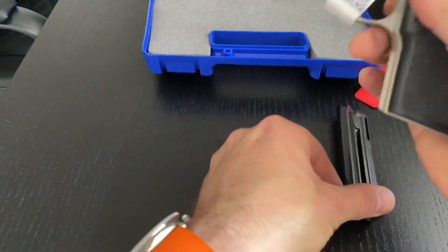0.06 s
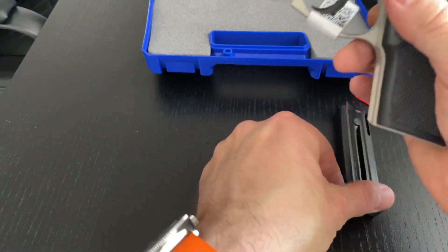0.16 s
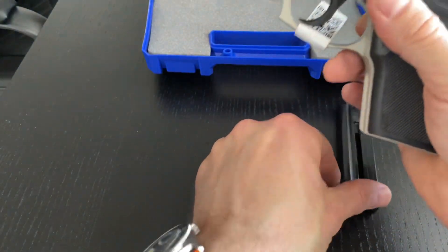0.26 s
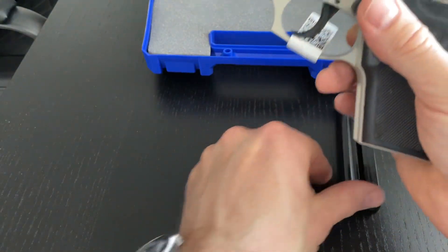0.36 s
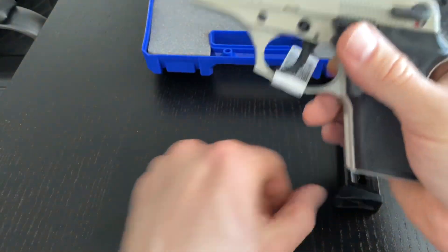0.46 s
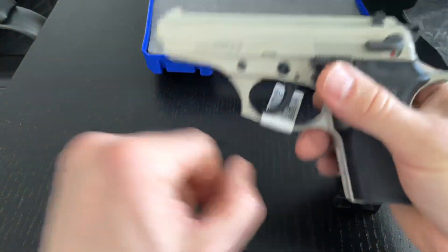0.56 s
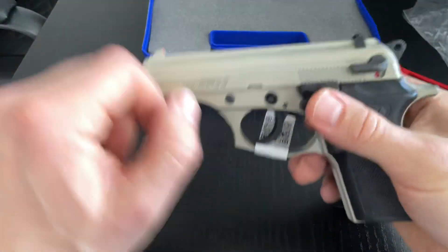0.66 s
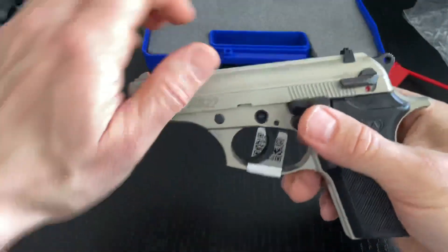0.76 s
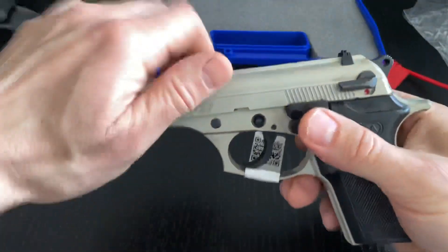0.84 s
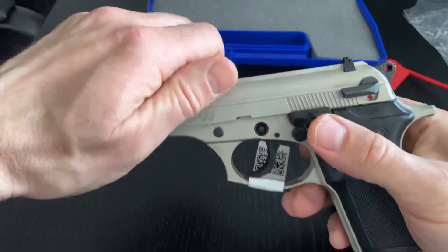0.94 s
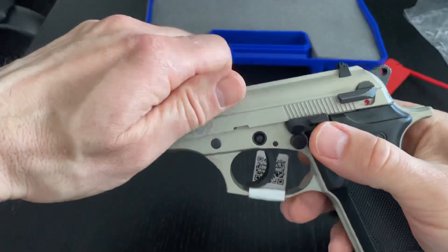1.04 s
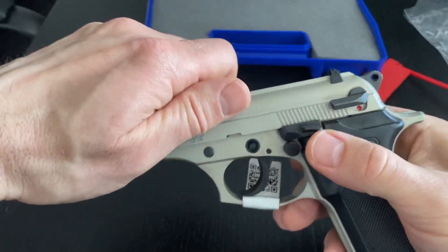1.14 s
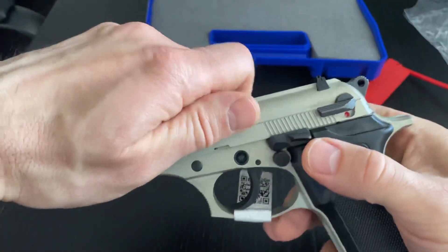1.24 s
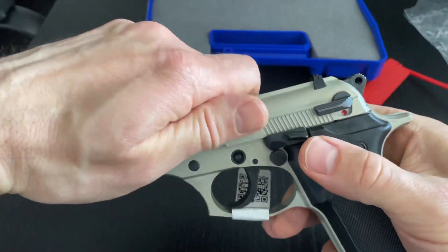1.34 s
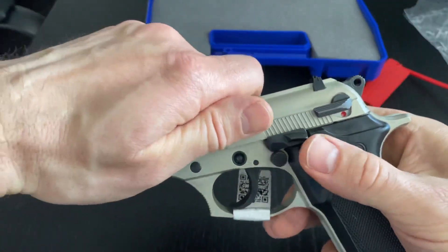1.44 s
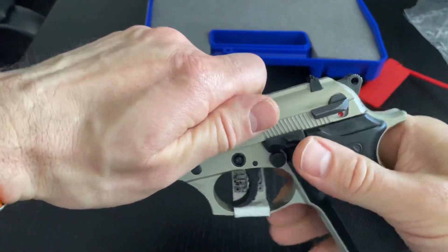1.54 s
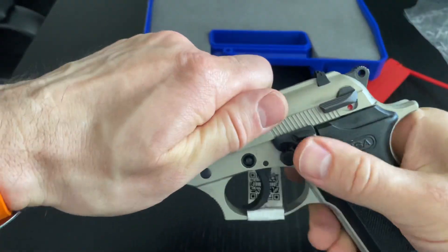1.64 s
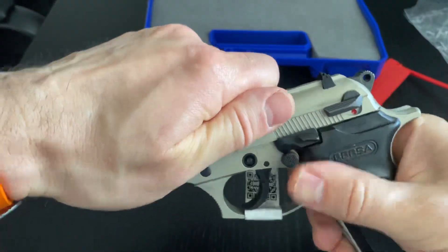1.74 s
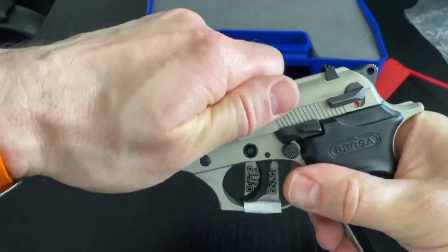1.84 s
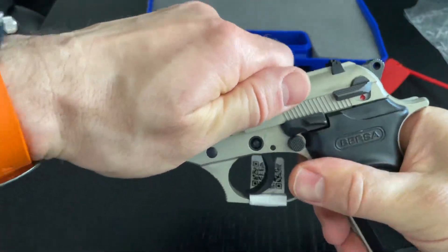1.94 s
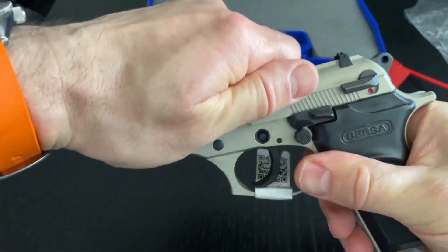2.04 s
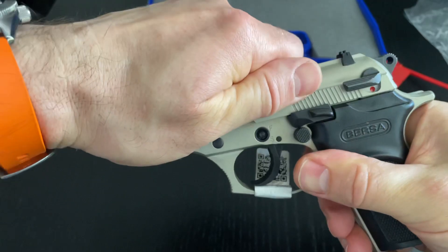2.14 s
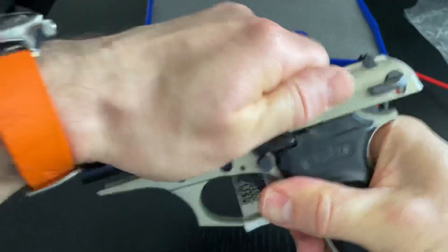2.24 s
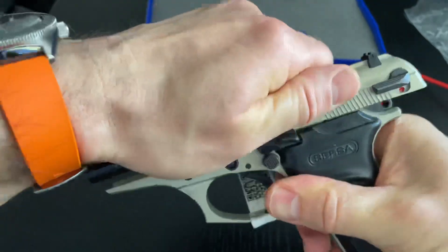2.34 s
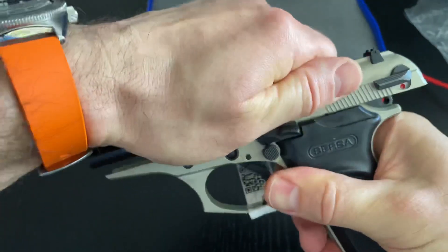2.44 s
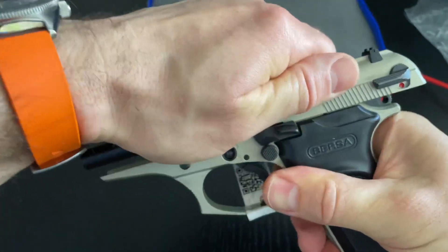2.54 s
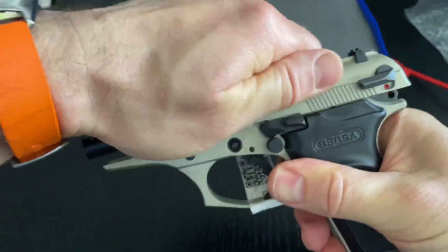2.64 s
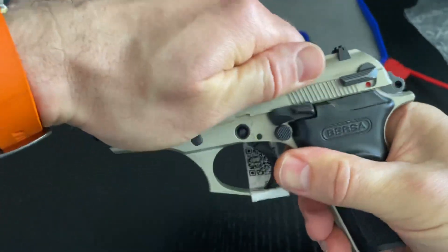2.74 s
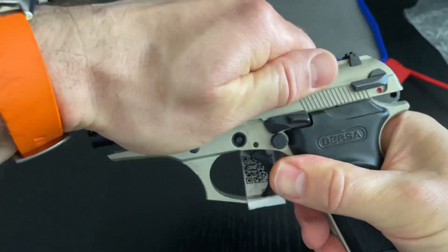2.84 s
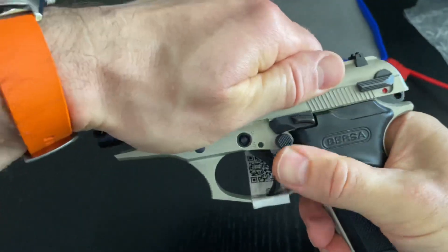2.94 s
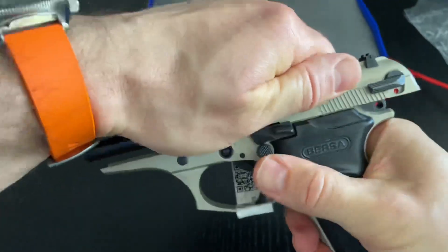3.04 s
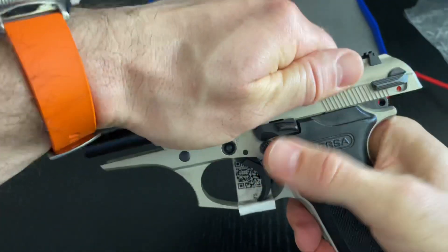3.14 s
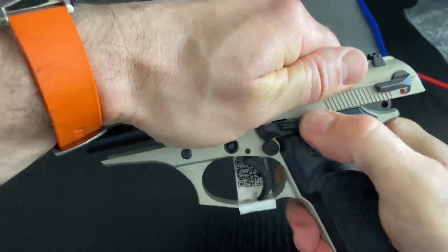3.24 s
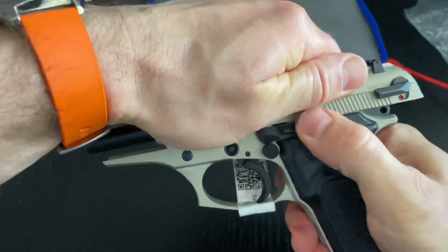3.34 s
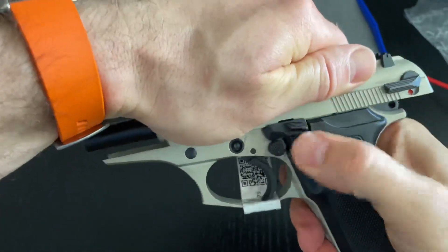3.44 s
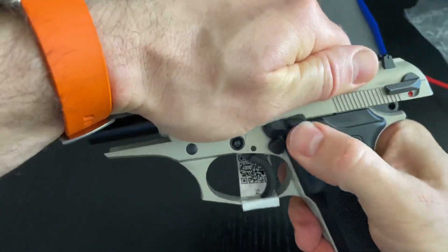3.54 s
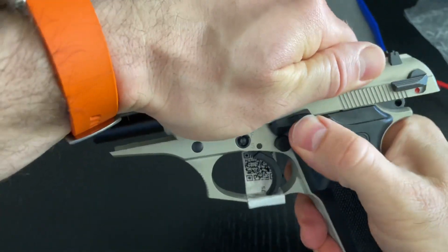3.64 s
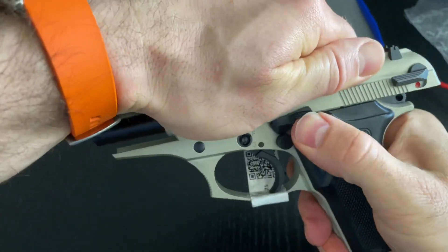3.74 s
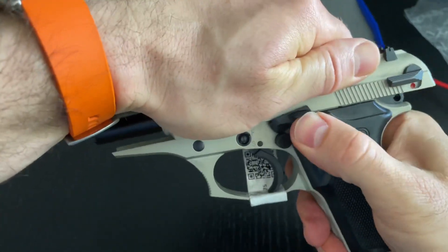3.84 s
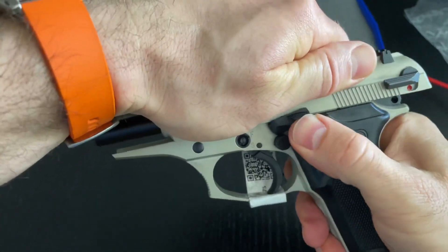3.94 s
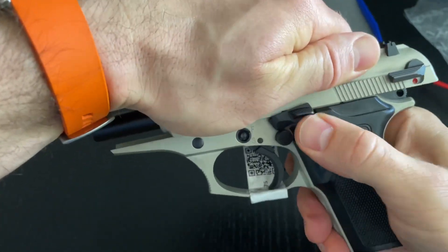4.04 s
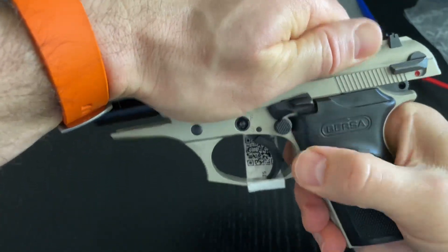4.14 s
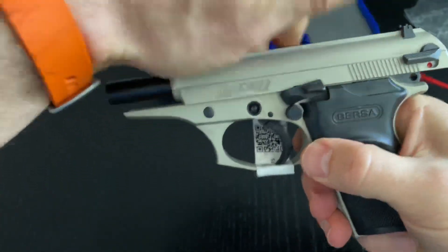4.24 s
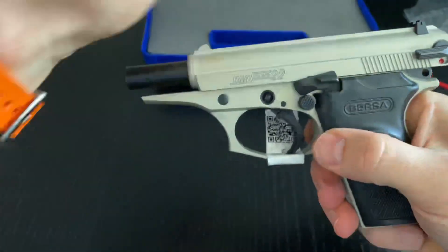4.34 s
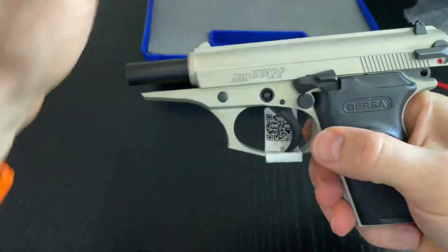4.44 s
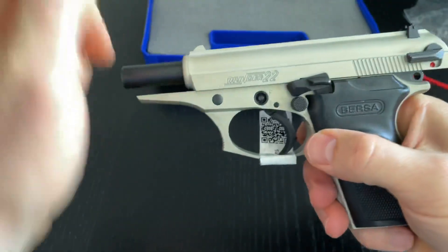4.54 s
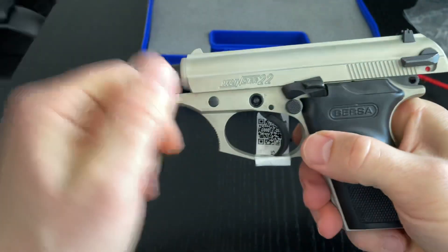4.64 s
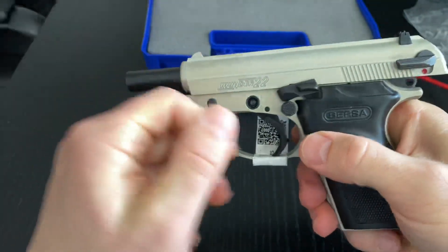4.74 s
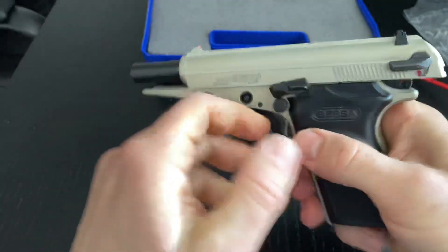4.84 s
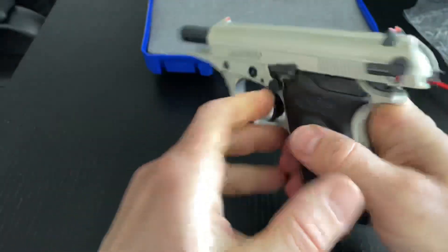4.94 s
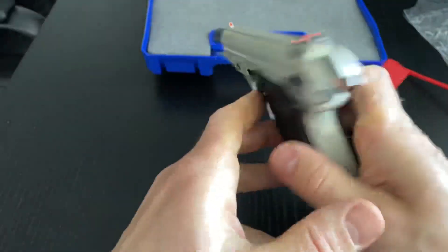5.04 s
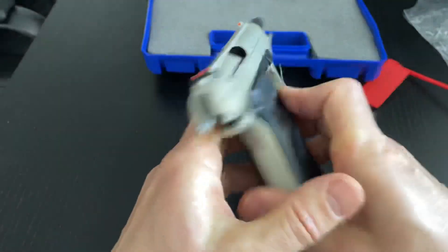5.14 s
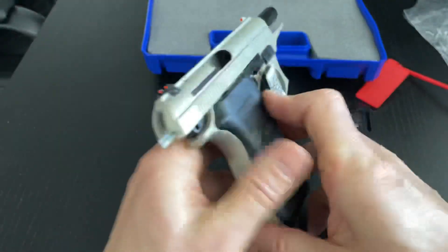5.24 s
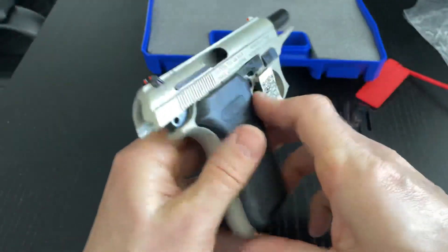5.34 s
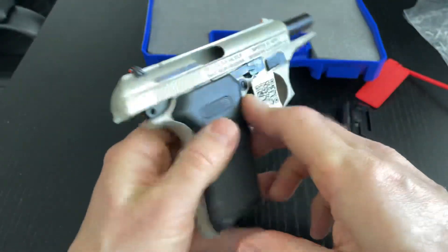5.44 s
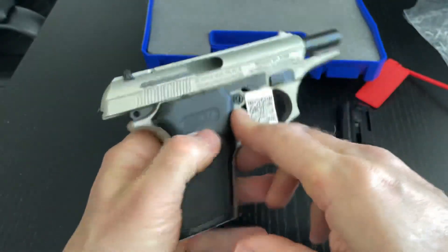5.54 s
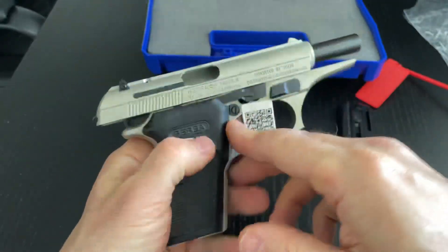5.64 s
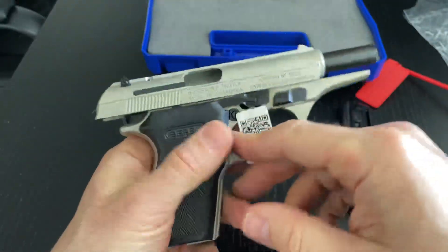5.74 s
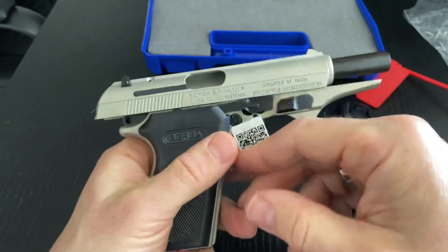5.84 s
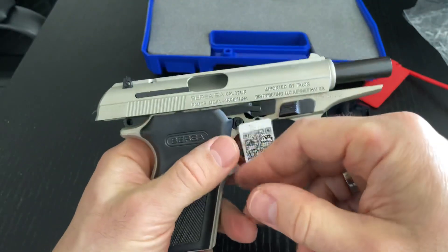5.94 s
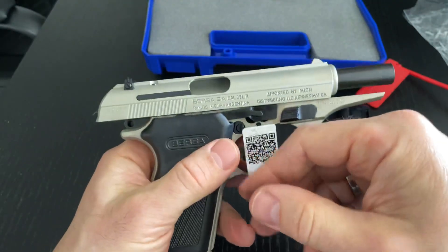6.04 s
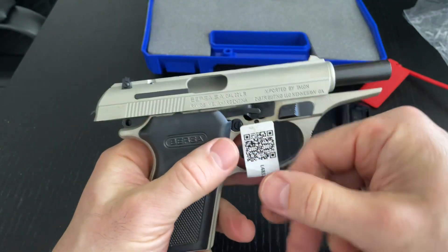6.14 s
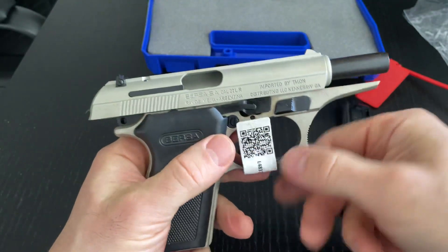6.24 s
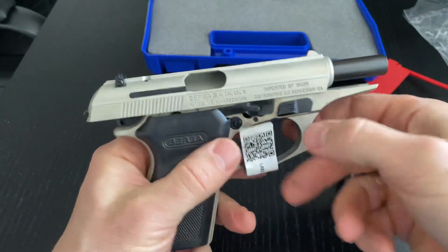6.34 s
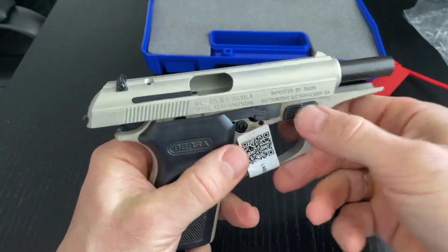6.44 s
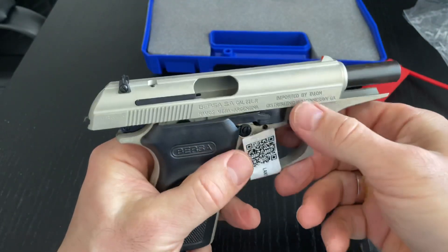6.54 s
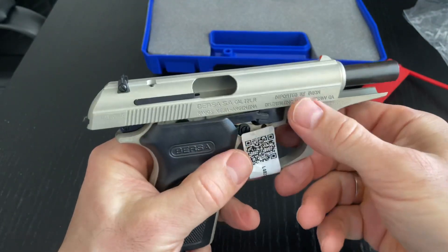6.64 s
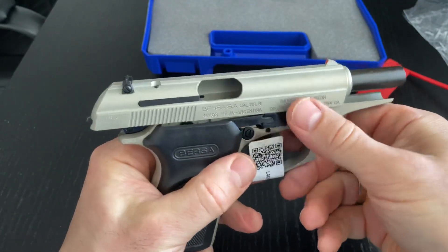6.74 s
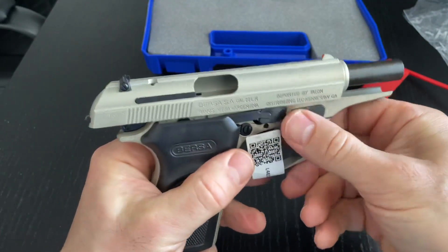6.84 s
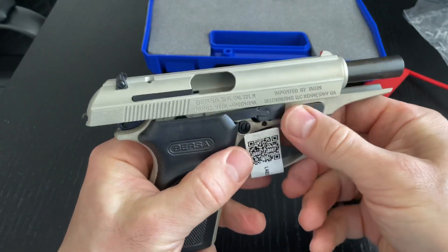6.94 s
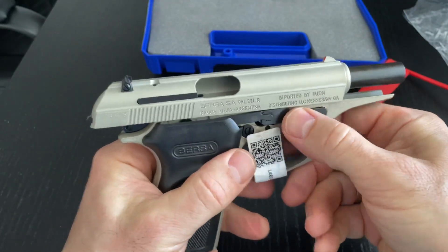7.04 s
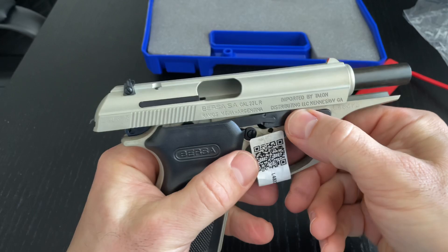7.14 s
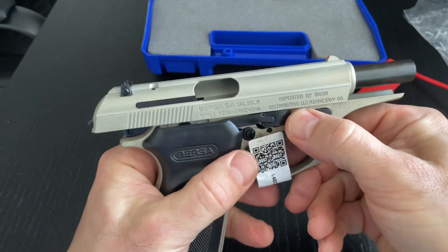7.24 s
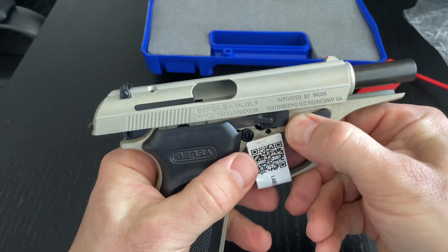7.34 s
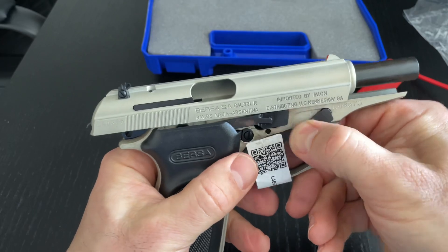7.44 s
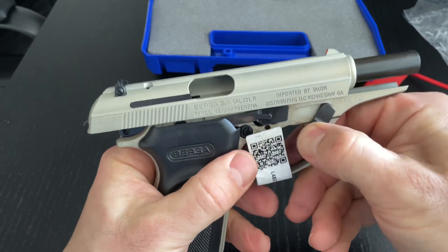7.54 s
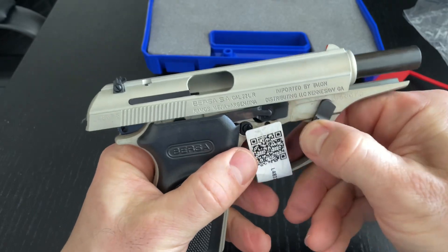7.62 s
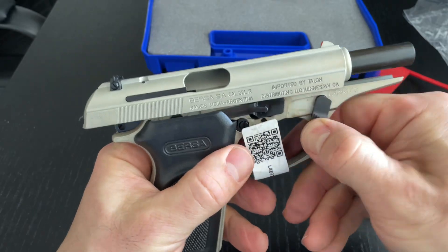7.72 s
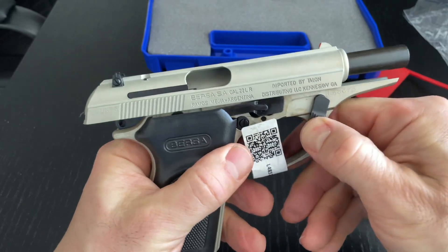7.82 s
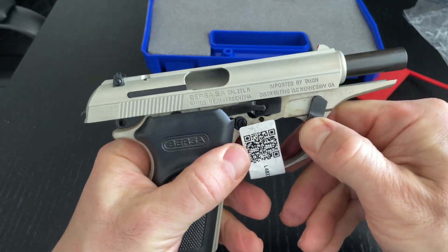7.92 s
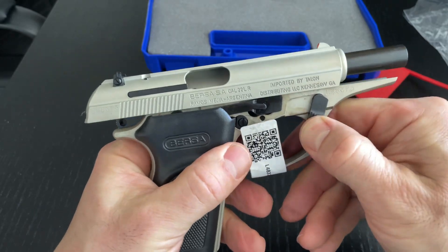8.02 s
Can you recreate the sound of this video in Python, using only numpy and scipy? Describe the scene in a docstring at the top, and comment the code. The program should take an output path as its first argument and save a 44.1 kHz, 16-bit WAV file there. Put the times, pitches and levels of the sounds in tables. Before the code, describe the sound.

A magazine clatters onto a desk, then a pistol's slide rasps back and clacks twice, followed by faint clicks and finger rubbing.

```python
"""A pistol is taken apart by hand over a desk, close to a phone, above the low rumble of a small room.
First the magazine drags over the desk, tips over and rattles to rest. Hands close round the gun with
a soft hiss. From about two to three seconds the slide rasps along its rails and twice clacks against
its stop, making the steel ring. Then the takedown lever clicks, and fingers rub over the frame
and turn it over, with a few last faint ticks."""
import sys
import numpy as np
from scipy import signal
from scipy.fft import rfft, irfft, next_fast_len
from scipy.io import wavfile
from scipy.ndimage import uniform_filter1d, minimum_filter1d

SR = 44100
rng = np.random.default_rng(int(sys.argv[2]) if len(sys.argv) > 2 else 0)


def store_wav(level_fs):
    """Save 16-bit WAV to argv[1]."""
    pcm = np.round(np.clip(np.atleast_2d(level_fs), -1, 1) * 32767)
    wavfile.write(sys.argv[1], SR, pcm.T.astype(np.int16))


N = 356328
TIME = np.arange(N) / SR
RING_TIME = np.arange(SR // 5) / SR  # the seconds of one short ring
SIDES = np.array([[.5], [-.5]])  # splits a difference between left and right


def undb(db):
    """Turn decibels into a factor to multiply by."""
    return 10 ** (np.asarray(db) / 20)


def unit(x):
    """Scale a sound to an energy of one per channel, on average."""
    return x / np.sqrt(np.mean(np.sum(x ** 2, axis=-1)))


def fade(t, ring_s):
    """Die away by 60 dB over the ring time."""
    return np.exp(-np.log(1000) * t / ring_s)


def colour(x, points):
    """Shape the tone along a curve of (pitch [Hz], level [dB]) points."""
    size = 2 * next_fast_len(x.shape[-1] // 2 + 1)
    hz, db = np.transpose(points)
    grid = np.arange(size // 2 + 1) * SR / size
    curve_db = np.interp(np.log(grid + 1), np.log(hz), db)
    cepstrum = irfft(np.log(undb(curve_db)))
    # folding this onto its first half keeps the filter from ringing ahead of a hit
    cepstrum[1:size // 2] *= 2
    cepstrum[size // 2 + 1:] = 0
    return irfft(rfft(x, size) * np.exp(rfft(cepstrum)))[..., :x.shape[-1]]


def through(x, response):
    """Let a sound set an object ringing; response is its stereo answer to one tap."""
    return signal.fftconvolve(np.atleast_2d(x), response, axes=-1)[:, :x.shape[-1]]


def stereo_noise(size, side_db):
    """Even hiss; side_db says how much left and right differ."""
    mid, side = rng.standard_normal((2, size))
    side = side * undb(side_db)
    return np.array([mid + side, mid - side]) / np.hypot(1, undb(side_db))


def drift(rate):
    """Wander around zero, reaching a new random value rate times a second."""
    steps = rng.standard_normal(size=N // 16)
    return np.interp(TIME * rate, np.arange(len(steps)), steps)


def add(out, s, sound):
    """Mix a sound in at s seconds."""
    start = max(int(s * SR), 0)
    out[:, start:start + sound.shape[1]] += sound[:, :N - start]


def contact(chatter_ms, chatter_db):
    """One sharp hit followed by a dying chatter of tiny ones."""
    decay = np.exp(-RING_TIME * 1000 / max(chatter_ms, .1))
    force = undb(chatter_db) * unit(rng.standard_normal(len(RING_TIME)) * decay)
    force[0] += 1
    return force


def rumble():
    """Low room noise that drops after about three seconds, with a faint steady hiss."""
    # tone of the rumble: (pitch [Hz], level [dB])
    tone = [(15, -35.5), (28, -15), (52, 4.5), (100, -2), (131, -8), (170, -2), (195, -8.5), (243, -18),
            (515, -36.5), (1000, -40.5), (4260, -52), (12000, -60), (15000, -67.5)]
    # loudness of the rumble: (time [s], level [dB])
    loudness = [(0, -51.5), (1.5, -50.5), (2.9, -49), (3.3, -58), (4.3, -58), (8.08, -58.5)]
    low = colour(stereo_noise(N, side_db=-11), tone)
    level_db = np.interp(TIME, *np.transpose(loudness)) + 0.43 * drift(36)
    hiss = undb(-89) * stereo_noise(N, side_db=1.5)
    return low / low.std() * undb(level_db - 1.4 * SIDES) + hiss


def room(x):
    """Nearby surfaces add quick echoes, and the room adds a longer fading tail."""
    # the room's tail, band by band: (pitch [Hz], level [dB], ring time [s])
    tail_bands = [(150, -5.5, 0.41), (513, 3, 0.35), (1090, 6.5, 0.45), (2470, -2, 0.53), (3508, -2, 0.55),
                  (4600, 2, 0.41), (5972, -3.5, .5), (12500, -10.5, .5), (15000, -18, .25)]
    t = np.arange(SR) / SR
    hz, levels_db, rings_s = np.transpose(tail_bands)
    grid = np.log(np.arange(SR // 2 + 1) + 1)
    noise = rfft(stereo_noise(SR, side_db=0.5))
    bands = [irfft(noise * np.interp(grid, np.log(hz), weight)) for weight in np.eye(len(hz))]
    tail = sum(band * undb(db) * fade(t, ring_s) for band, db, ring_s in zip(bands, levels_db, rings_s))
    early = stereo_noise(SR, side_db=-1.5) * fade(t, 0.14)
    arrival = np.clip(t / 0.0056 - 1, 0, 1)  # no echo in the first 5.6 ms
    return x + through(x, undb(-19) * unit(tail * arrival) + undb(-12.5) * unit(early * arrival))


def palms(hiss):
    """Palms shift round the gun; the changing hollows under them make bands of hiss swell and fade."""
    # hands close on the gun and later turn it, one curve per move: (time [s], relative level [dB])
    moves = [
        [(0.56, -85), (0.602, -74), (0.692, -69.5), (0.704, -75.5), (0.736, -71), (0.76, -96.5), (0.788, -93),
         (0.85, -66.5), (0.872, -77), (0.888, -69.5), (0.904, -63.5), (0.92, -71.5), (0.956, -79),
         (0.972, -64.5), (0.986, -78), (1.02, -84)],
        [(1.02, -85.5), (1.104, -85.5), (1.158, -78), (1.164, -67.5), (1.3, -88), (1.342, -73), (1.428, -91),
         (1.44, -76), (1.536, -60.5), (1.604, -77.5), (1.682, -75.5), (1.71, -66), (1.906, -81), (1.94, -67.5),
         (2.002, -91.5), (2.04, -90)],
        [(4.81, -99), (4.83, -70), (4.928, -82), (4.94, -74), (4.98, -85), (5.174, -81.5), (5.296, -104),
         (5.34, -84.5), (5.432, -88), (5.462, -104), (5.524, -86), (5.688, -79), (5.736, -99.5), (5.788, -75),
         (5.836, -95), (5.93, -86)],
    ]
    boost_db, hollow_db, dulling_db_per_band = 7, 3, 0.8
    level = sum(undb(np.interp(TIME, *np.transpose(move), left=-np.inf, right=-np.inf) + boost_db)
                for move in moves)
    edges_hz = np.geomspace(300, 16000, 8)
    out = np.zeros((2, N))
    for k, band_hz in enumerate(zip(edges_hz, edges_hz[1:])):
        band = signal.sosfilt(signal.butter(2, band_hz, "bandpass", fs=SR, output="sos"), hiss)
        out += (-1) ** k * band * undb(hollow_db * drift(10) - dulling_db_per_band * k)
    return level * out


def hands(pistol):
    """Palms and fingers hiss over the gun; a firm press also makes the steel sound."""
    # tone of the rubbing hiss as the phone picks it up: (pitch [Hz], level [dB])
    hiss_tone = [(100, -18.5), (500, -1), (1200, -3), (2200, -1.5), (3700, 0), (6000, -0.5), (8300, -9.5),
                 (10500, -0.5), (12800, -7), (14500, -17.5)]
    # a finger slides over the gun: (time [s], length [s], level [dB], press on the steel [dB])
    rubs = [(0, 0.56, -65, 2.5), (1.163, 0.045, -63.5, 4.5), (1.476, 0.12, -70, 0.5),
            (2.049, 0.054, -55.5, 4.5), (3.169, 0.034, -54.5, -0.5), (3.379, 0.039, -64, -7),
            (3.841, 0.045, -59, 5.5), (4.063, 0.04, -68.5, -7), (4.108, 0.15, -77, 4),
            (4.63, 0.1, -78.5, -13), (4.829, 0.054, -68.5, -12), (6.056, 0.091, -79, -15),
            (6.158, .045, -79, -12), (6.254, .05, -75, -21), (6.367, 0.039, -72.5, -12),
            (6.74, .13, -78.5, -4), (7.007, .1, -75.5, -13.5), (7.393, 0.14, -84, -9),
            (7.691, 0.091, -70, -10.5)]
    hiss = colour(stereo_noise(N, side_db=-1.0), hiss_tone)
    hiss = hiss / hiss.std() * undb(-1.2 * SIDES)
    push_tone = [(500, -1), (1100, 1.5), (1800, -1), (3600, 3.5), (4700, -6), (11000, -3.5)]
    steel = through(colour(rng.standard_normal(N), push_tone), pistol)
    out = palms(hiss + undb(-14.5) * steel)
    hz = np.geomspace(600, 15000, 16)
    hollows_db = 2 * rng.standard_normal((len(rubs), len(hz)))  # each hand shape has its own tone
    for (s, length, db, press_db), hollow_db in zip(rubs, hollows_db):
        touching = (TIME > s) & (TIME < s + length)
        progress = (TIME[touching] - s) / length
        swell = np.abs(np.sin(np.pi * progress ** 0.61))
        rub = swell * (hiss[:, touching] + undb(press_db) * steel[:, touching])
        dulling_db = 0.2371 * (press_db + 10) * np.log(hz / 4000)  # a harder press sounds duller
        add(out, s, undb(db) * colour(rub, np.transpose([hz, hollow_db - dulling_db])))
    ridges = undb(2.8 * drift(400) + 1.2 * drift(40))
    return out * ridges


def magazine():
    """The magazine drags and bumps over the desk, then tips over flat and rattles to rest."""
    # notes the desk top rings at: (pitch [Hz], level [dB], ring time [s])
    desk_notes = [(434, -3.5, .15), (515, 4.5, 0.09), (624, -3.5, 0.18), (695, -6, 0.12),
                  (780, -5.5, 0.085), (890, -3, 0.22), (934, -12, 0.079), (1123.4, -12.5, 0.086),
                  (1394, -7, .08), (1540, -3.5, 0.069), (2010, -10, .05), (2762, -14.5, 0.033)]
    # tone of a sharp crack on the desk: (pitch [Hz], level [dB])
    crack_tone = [(20, -44.5), (60, -21.5), (150, -17), (290, -17), (420, 3), (850, 5), (1150, -4),
                  (1700, -5), (2900, -10.5), (4000, -20), (6000, -22.5), (10000, -29), (15000, -37.5)]
    # loudness of the dragging: (time [s], level [dB])
    dragging = [(0, -46), (.07, -45.5), (.17, -44.5), (.24, -51), (.275, -38), (.29, -68.5)]
    # the magazine hits the desk: (time [s], level [dB], hardness in the treble [dB], rattle [ms])
    knocks = [(0.0341, -36.5, -18.5, 2), (0.1267, -32, -24.5, 1.5), (.2785, -12.5, 4, 2.7),
              (0.2819, -15, -1.5, 3), (.3, -19.5, -4, 22), (.322, -23, -12.5, 18), (0.516, -52, -35, 16)]
    t = RING_TIME
    desk = np.zeros((2, len(t)))
    for k, (hz, db, ring_s) in enumerate(desk_notes):
        shift = (-1) ** k * SIDES * hz / 900  # higher notes differ more between left and right
        desk += undb(db) * unit(np.sin(2 * np.pi * hz * t + shift) * fade(t, ring_s))
    desk = unit(desk)
    drag_db = np.interp(TIME, *np.transpose(dragging), right=-np.inf) + 3 * drift(120.2)
    drag_tone = [(300, -0.5), (700, 0), (1500, -3.5), (5000, -4.5)]
    out = through(colour(undb(drag_db) * rng.standard_normal(N), drag_tone), desk)
    for s, db, hard_db, rattle_ms in knocks:
        crack = colour(stereo_noise(len(t), side_db=-6.0) * fade(t, 0.043), crack_tone)
        ring = through(contact(rattle_ms, chatter_db=-10), desk)
        tone = [(550, 0.0025), (1100, 1.8 * hard_db), (2200, hard_db), (5000, 0.87 * hard_db),
                (12000, 1.9 * hard_db), (15000, 1.3 * hard_db - 17)]
        hit = colour(unit(ring) + undb(6.5) * unit(crack), tone)
        add(out, s, undb(db) * unit(hit) * np.sqrt(SR / 50))  # level taken over 20 ms
    return out


def pistol_ring():
    """Tapped steel gives a few short notes over a crack made of countless weak ones."""
    # notes of slide and frame, muffled by the hands:
    # (pitch [Hz], level [dB], ring time [s], left minus right [dB], left's head start [rad])
    steel_notes = [(261.1, -22.5, 0.014, 1, 0.3), (442, -18.5, 0.051, -2, 3.5), (1017, -7, .025, 6, 5),
                   (1145, -4, 0.023, 0.5, -1.44), (1570, -14.5, 0.03, 0, 0.67), (2000, -11, .008, -2, 1.2),
                   (2380, -6, .012, -3, 1.4), (2870, -9.5, 0.0034, 1, 1), (4130, -10, .005, 6, 3.5),
                   (4400, -5, .016, 5, -1.3), (4640, 0, .018, 5, 1.2), (4820, -9, .012, 4, .8),
                   (6600, -9.5, 0.0055, -1, -3.38), (7250, -12, 0.009, -3, 3.5),
                   (9950, -7.5, .004, -5.5, 1.95), (11570, -6, 0.0031, 1.5, 0.25),
                   (13000, -12.5, 0.0054, 1.5, 4)]
    # tone of the steel's crack: (pitch [Hz], level [dB])
    crack_tone = [(60, -11), (250, -7), (600, -8.5), (1100, 4), (4500, 4.5), (8000, -5), (13000, -14),
                  (16000, -12.5)]
    t = RING_TIME
    notes = np.zeros((2, len(t)))
    for hz, db, ring_s, pan_db, lead in steel_notes:
        note = np.sin(2 * np.pi * hz * t + lead * SIDES) * fade(t, ring_s)
        notes += undb(db + pan_db * SIDES) * unit(note)
    crack = colour(stereo_noise(len(t), side_db=-3.5) * fade(t, .024), crack_tone)
    return unit(unit(notes) + undb(-3.0) * unit(crack))


def snaps(pistol):
    """The takedown lever and other small parts flip against their springs, buzz and jolt the frame."""
    # a part flips: (time [s], level [dB], pitch [Hz], ring time [s], share of the frame [dB])
    flips = [(1.076, -56, 1042, 0.017, -28), (3.488, -59, 2390, 0.025, -7), (3.5673, -40, 2785, 0.014, -15),
             (3.8598, -42, 1128, 0.02, -15.5), (6.707, -66, 780, .02, -18)]
    out, t = np.zeros((2, N)), RING_TIME
    for s, db, hz, ring_s, frame_db in flips:
        note = unit(np.sin(2 * np.pi * hz * t) * fade(t, ring_s)) * undb(3 * SIDES)
        buzz_tone = [(hz / 2, -30), (hz * .8, 0), (hz * 1.2, 0), (hz * 2, -30)]
        buzz = colour(stereo_noise(len(t), side_db=-6) * fade(t, 2 * ring_s), buzz_tone)
        snap = note + .7 * unit(buzz) + undb(frame_db) * pistol
        add(out, s, undb(db) * unit(snap) * np.sqrt(SR / 200))  # level taken over 5 ms
    return out


def slide(pistol):
    """The slide sticks and slips on its rails: a gritty zip whose pitch rises and falls with speed."""
    # the hand pushes the slide:
    # (time [s], speeding up [s], slowing down [s], top slip rate [Hz], level [dB], grit [dB])
    strokes = [(2.193, .021, 0.063, 2450, -31.5, -2), (2.229, .015, 0.044, 4800, -29.5, 4),
               (2.586, .062, .014, 2203, -39, 0), (2.64, 0.047, 0.037, 2247, -39, 1),
               (2.771, .04, 0.01, 2350, -36, -11), (2.952, .028, 0.028, 4850, -30.5, -3)]
    slowest_hz, bite_s, db_per_octave = 840.4, 0.011, 3
    force = np.zeros(N)
    unevenness = 1 + .13 * drift(1800)
    grit_tone = [(300, -19), (1000, 1.5), (1600, 2.5), (2400, 5), (4600, -4), (8000, 0.5),
                 (13000, -0.5), (15000, -13.0)]
    grit = colour(rng.standard_normal(N), grit_tone) * undb(3.5 * drift(700))
    for s, rise_s, fall_s, top_hz, db, grit_db in strokes:
        moving = (TIME > s) & (TIME < s + rise_s + fall_s)
        t = TIME[moving] - s
        speed = np.minimum(t / rise_s, 1 - (t - rise_s) / fall_s)
        hz = slowest_hz * (top_hz / slowest_hz) ** speed
        # the rails bite as the slide breaks loose, and quieten as the push dies away
        bite = np.minimum(t / bite_s, 1) * np.clip((rise_s + fall_s - t) / fall_s, 0, 1) ** 0.55
        phase = 2 * np.pi * np.cumsum(hz * unevenness[moving]) / SR
        slips = np.sin(phase) + .25 * np.sin(2 * phase)
        rasp = undb(grit_db) * grit[moving] * (1 + .35 * np.cos(phase))
        gain = bite * undb(db + db_per_octave * np.log2(hz / top_hz))
        force[moving] += gain * (slips + rasp)
    return through(force, pistol)


def clicks_and_clacks():
    """Small parts and the slide strike the same steel; where they hit decides which notes ring most."""
    # small parts hit the frame; body is the tone near 1 kHz, top the tone near 11 kHz:
    # (time [s], level [dB], body [dB], top [dB], chatter [ms])
    clicks = [(1.162, -55.5, -16, 5, 6), (1.347, -56, 13, 3, 1.7), (1.444, -57.5, -14, -9, 2.1),
              (2.057, -38.5, 3.5, 0, .3), (2.0762, -28, -3, 3, 1.2), (2.2084, -23, -22.5, 6, 1.4),
              (2.2454, -14, -10, 11, .7), (2.646, -36.5, -10.5, -16.5, 1.2), (2.8122, -22.5, -8, -3, .66),
              (3.714, -68, -10, -2, 0.59), (4.195, -61, 8, 22, 2), (5.944, -61, 5, 11, 1),
              (6.7078, -55.5, 0, 23, .8)]
    # the slide slams into its stop: (time [s], level [dB], top [dB])
    clacks = [(2.2617, -3, 1), (2.9928, -7, 2)]
    # each clack's first touch, full blow and rebound:
    # (delay [ms], added level [dB], body [dB], chatter [ms])
    bounces = [(-2.5, -15.5, 1, 0.96), (0, 2.5, -11.5, 0.86), (2.5, -2.5, -3.5, 0.92)]
    out = np.zeros((2, N))
    blows = [(s + delay_ms / 1000, db + added_db, body_db, top_db, chatter_ms)
             for s, db, top_db in clacks for delay_ms, added_db, body_db, chatter_ms in bounces]
    for s, db, body_db, top_db, chatter_ms in clicks + blows:
        jolt_db = max(0.24 * (db + 12), -5)  # hard blows jolt the whole frame and gain bass
        tone = [(400, body_db + jolt_db), (1100, body_db), (1600, 1.6 * body_db - 2.5),
                (2400, .4 * body_db + 4.5), (3300, .3 * body_db - 1), (4500, 0.5), (5600, 1.0),
                (7500, 0.15 * top_db + 2.5), (11000, top_db), (13500, top_db - 3), (16000, top_db - 8.5)]
        ring = through(contact(chatter_ms, chatter_db=3.0), pistol_ring())  # a new crack for each blow
        add(out, s, undb(db) * unit(colour(ring, tone)) * np.sqrt(SR / 200))  # level taken over 5 ms
    return out


def scene():
    """Pistol, hands and desk share one rumbling room."""
    pistol = pistol_ring()
    handling = clicks_and_clacks() + snaps(pistol) + slide(pistol) + magazine() + hands(pistol)
    return room(handling) + rumble()


def record(dry):
    """The phone turns itself down at each hard clack, recovers slowly and cuts the highest treble."""
    limit_db, recovery_db_per_s, top_hz = -3, 36, 15700
    peak_db = 20 * np.log10(np.abs(dry).max(axis=0) + 1e-9)
    recovery_db = recovery_db_per_s * TIME
    held_db = np.maximum.accumulate(peak_db + recovery_db) - recovery_db
    gain_db = np.minimum(limit_db - held_db, 0)
    smooth_db = uniform_filter1d(minimum_filter1d(gain_db, size=45), size=45)  # over about 1 ms
    treble_cut = signal.ellip(8, .2, 70, top_hz, fs=SR, output="sos")
    return signal.sosfilt(treble_cut, dry * undb(smooth_db))


dry = scene()
out = record(dry)
store_wav(out)
```